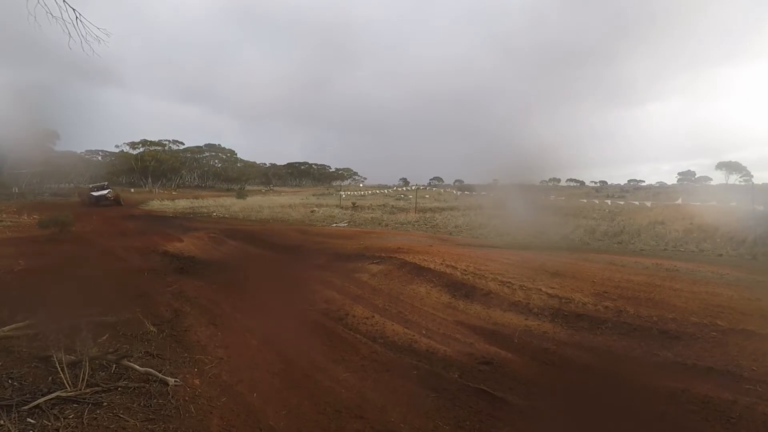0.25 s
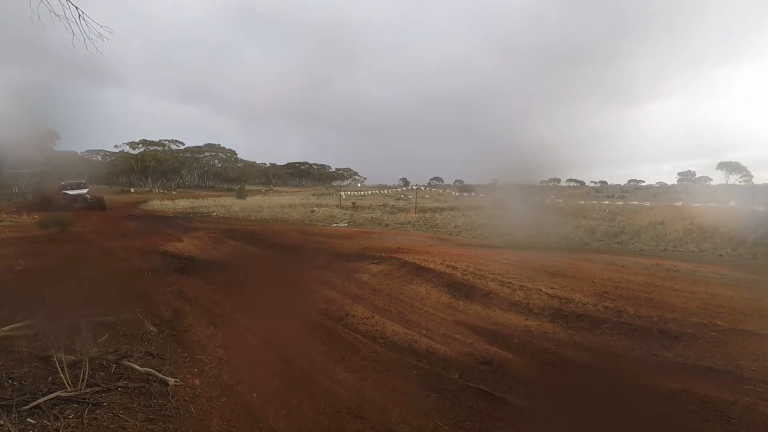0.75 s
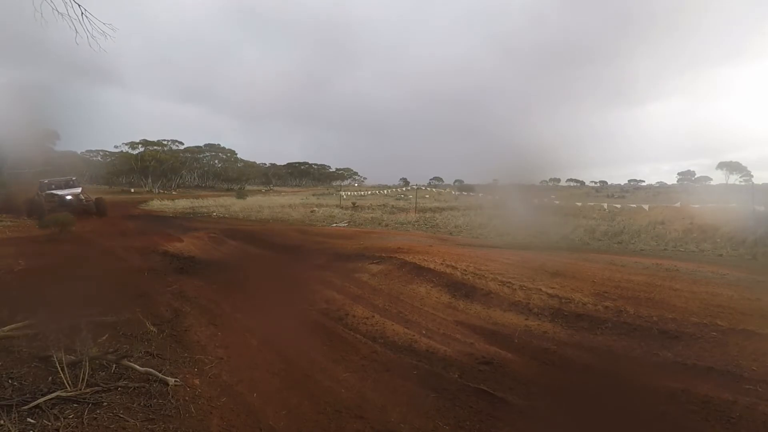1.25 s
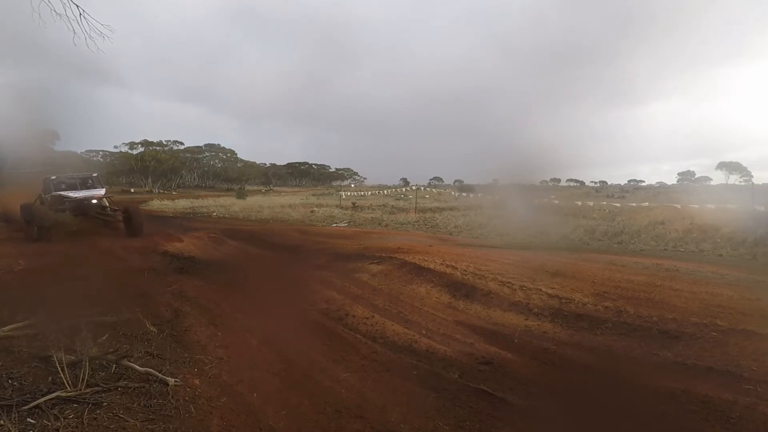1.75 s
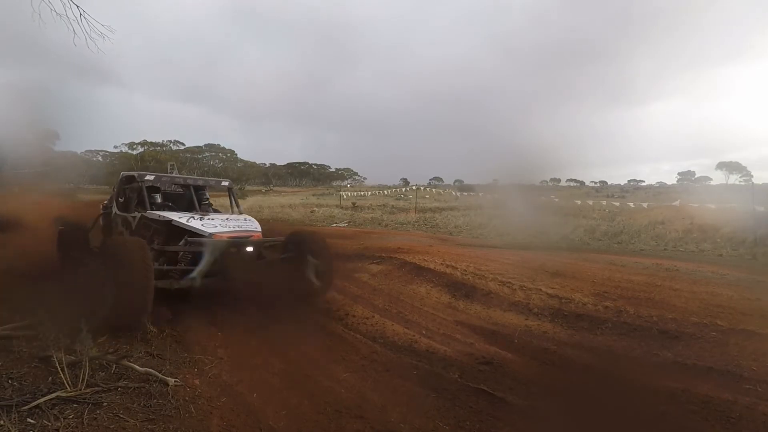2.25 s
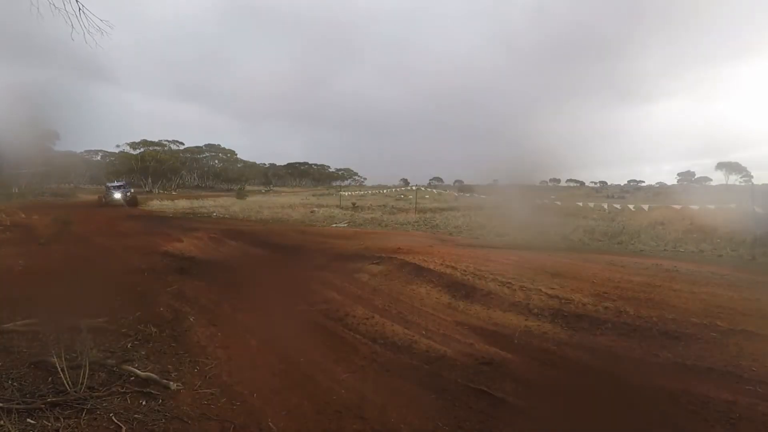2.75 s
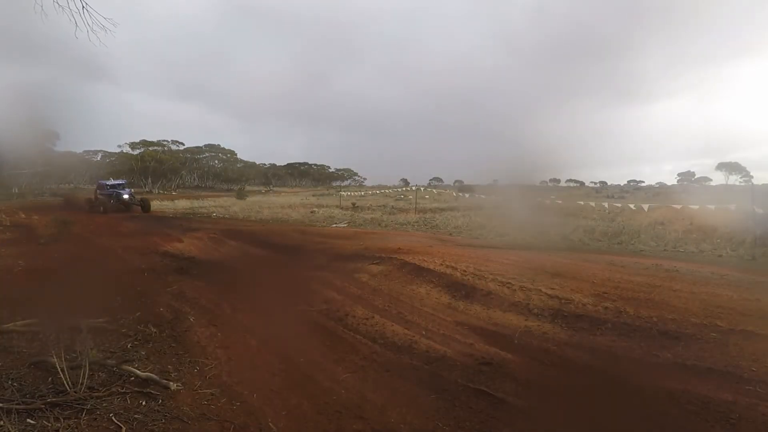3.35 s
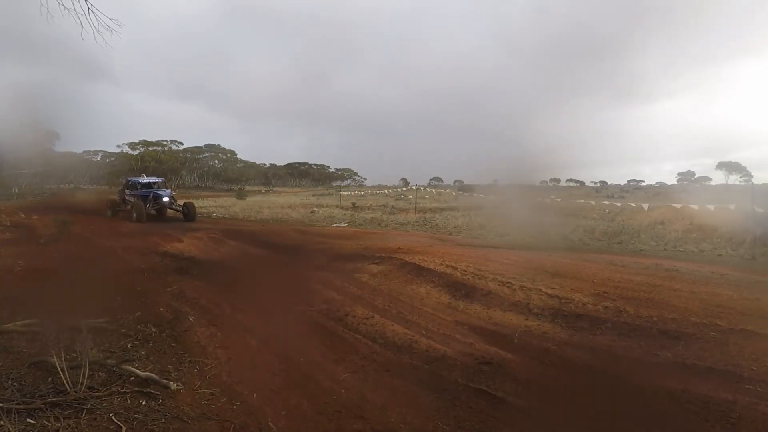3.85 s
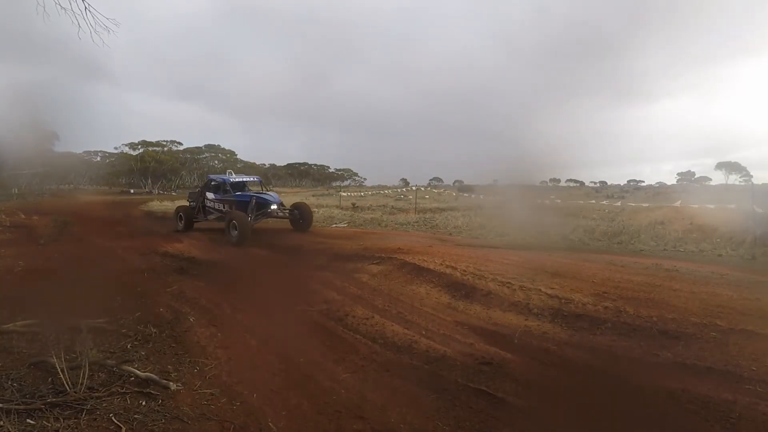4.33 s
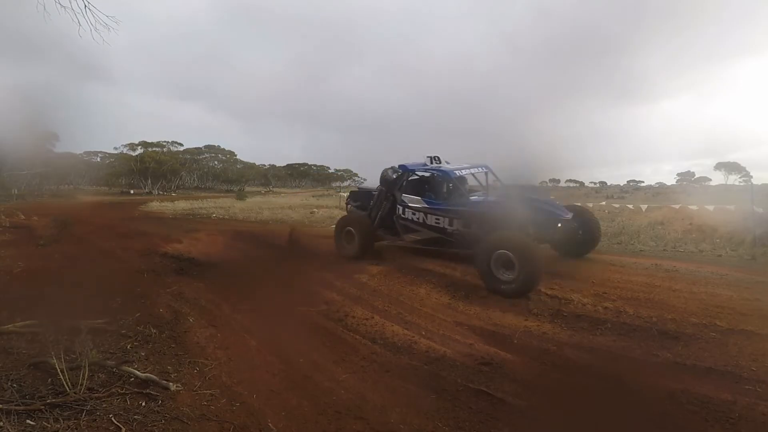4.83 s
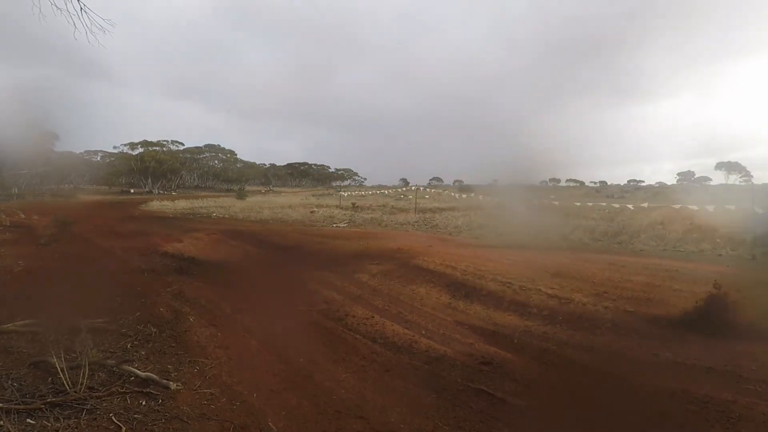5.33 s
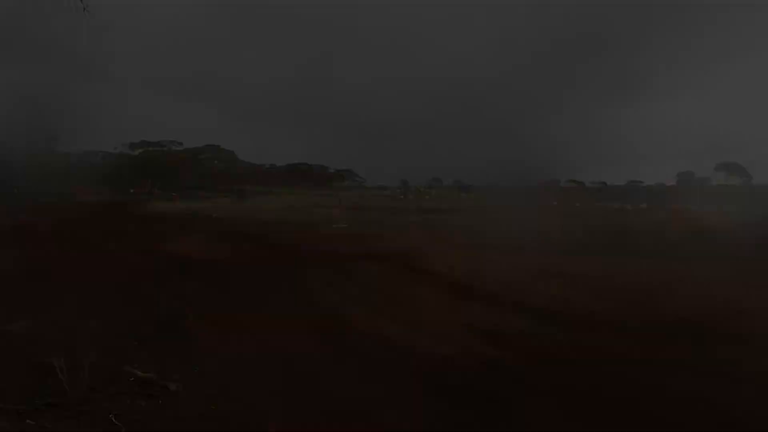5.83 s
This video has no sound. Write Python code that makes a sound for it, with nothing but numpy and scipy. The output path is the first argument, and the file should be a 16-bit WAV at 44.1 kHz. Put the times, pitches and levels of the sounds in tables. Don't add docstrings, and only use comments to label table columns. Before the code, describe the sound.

Loud off-road race buggies rev, blip and roar one after another through a gritty dirt corner, then snarl away and fade under scattered clod thuds.

```python
import sys
import numpy as np
from scipy import signal
from scipy.fft import rfft, irfft, next_fast_len
from scipy.io import wavfile
from scipy.ndimage import uniform_filter1d, minimum_filter1d

SR = 44100
rng = np.random.default_rng(int(sys.argv[2]) if len(sys.argv) > 2 else 0)


def rack_gain(trim_db):
    fader = np.asarray(trim_db, float)
    return 10 ** (fader / 20)


def master(y):
    cut = np.clip(np.atleast_2d(y).T, -1, 1)
    pcm = np.round(cut * 32767)
    wavfile.write(sys.argv[1], SR, pcm.astype(np.int16))


N = 268569
TIME = np.arange(N) / SR

FIRST_BLIP = [(0.0, 22.5, -14, 4), (0.139, 21.9, -11.5, -4.5), (0.24, 23.3, -7.5, -12),
              (0.29, 28.3, -16, 10.5), (0.37, 31.2, -8.5, 2.5), (0.479, 35.6, -4.5, -0.5),
              (0.56, 38.58, -4.5, -0.5), (0.619, 35.6, -11.5, 6.5), (0.7, 30.3, -29.5, 14)]
FIRST_PULL = [(.83, 26.4, -14.5, 5.5), (1.037, 34.3, -3.5, -5.5), (1.149, 35.1, -6.5, -1),
              (1.23, 36.44, -4, -1.5), (1.31, 37, -5, 1), (1.394, 39.26, -8.5, 1),
              (1.653, 38.52, -8.5, 0.5), (1.74, 37.52, -8, 2), (1.864, 37.52, -5, -0.5),
              (1.946, 35.06, -10, 0.5), (2.079, 32.07, -20, 10)]
THIRD_ENTRY = [(2.6, 26.8, -25, 7), (2.769, 23.8, -10, -3.5), (2.921, 29.3, -12, -3.5),
               (2.988, 26.4, -8.5, -8), (3.051, 28.4, -10, -10.5), (3.119, 24.4, -10.5, -12),
               (3.27, 31.2, -12.5, 0.5), (3.381, 32.9, -12.5, 3), (3.48, 30.3, -10.5, 1.5)]
THIRD_CORNER = [(3.48, 30.8, -17.5, 4), (3.531, 26.36, -8, -5), (3.6, 30.61, -13, -0.5),
                (3.724, 30.38, -11, 2), (3.794, 28.52, -15.5, 0.5), (3.98, 28.17, -12, 1.5),
                (4.042, 28.8, -14, -1.5), (4.098, 30, -17, 7), (4.139, 27.23, -13, -3.5)]
THIRD_SLOWING = [(4.202, 22.4, -12.5, -5.5), (4.265, 20.1, -15, -13.5), (4.322, 18.3, -17.5, -7),
                 (4.394, 16.5, -19, -7.5), (4.5, 16.7, -20, -4.5)]
THIRD_LEAVING = [(4.42, 16.92, -33, 14.5), (4.568, 22.6, -16.5, 4), (4.69, 22.5, -26.5, 15),
                 (4.739, 28.6, -6, 0), (4.812, 34.6, -1.5, -7), (4.928, 29.5, -9, -3),
                 (5.06, 27.1, -9, 0.5), (5.199, 23.3, -16, 4), (5.282, 26.6, -10, -0.5)]
THIRD_GONE = [(5.35, 30.22, -9.5, 0), (5.412, 28.29, -10.5, -2.5), (5.491, 25.34, -12.5, -1),
              (5.621, 24.85, -15, 2), (5.759, 24.72, -15, 0.5), (5.9, 23.3, -20.5, -0.5)]
# (frequency [Hz], level [dB])
HOUSING_TONE = [(1350, -8), (2300, -4), (2460, -5.5), (2940, -6), (3610, -0.5), (4120, -6), (5080, -2.5),
                (5770, -3.5), (7800, -21), (10100, -53), (17200, -120)]
# (middle [s], length [s], level [dB])
STEADY_LOAD = (1.5, 1.2, -4.5)


def evened(x):
    return x / np.sqrt(np.mean(abs(x) ** 2) + 1e-20)


def add(mix, s, sound):
    part = mix[max(round(s * SR), 0):][:len(sound)]
    part += sound[:len(part)]


def curve(rows):
    return np.interp(TIME, *np.transpose(rows))


def columns(rows):
    s, *values = np.transpose(rows)
    t = np.arange(max(s[0], 0), min(s[-1], N / SR), 1 / SR)
    return t, [np.interp(t, s, v) for v in values]


def swell(middle, length):
    return np.cos(np.pi * np.clip((TIME - middle) / length, -.5, .5)) ** 2


def coloured(x, points):
    hz, db = np.transpose(points)
    size = next_fast_len(len(x))
    f = np.fft.rfftfreq(size, 1 / SR)
    gain = rack_gain(np.interp(np.log(f + 1), np.log(hz), db, -90, -90))
    return evened(irfft(rfft(x, size) * gain, size)[:len(x)])


def drift(count, hz):
    knot_rate = 200
    knots = int(count / SR * knot_rate) + 2
    chance = rng.standard_normal((2, knots))
    smooth = signal.lfilter([1], [1, -np.exp(-2 * np.pi * hz / knot_rate)], chance)
    at = np.linspace(0, knots - 1, count)
    return evened(np.interp(at, np.arange(knots), smooth[0] + 1j * smooth[1]))


def gusty(points, lump_db, hz, gate=1):
    lumps = rack_gain(lump_db * drift(count=N, hz=hz).real)
    return coloured(rng.standard_normal(N) * lumps * gate, points)


def patchy(x, patch_db, frames, bins):
    z = signal.stft(x, nperseg=256)[2]
    field = uniform_filter1d(rng.standard_normal(z.shape), bins, 0)
    field = evened(uniform_filter1d(field, frames, 1))
    return evened(signal.istft(z * rack_gain(patch_db * field), nperseg=256)[1][:N])


def far_engine():
    # (frequency [Hz], level [dB])
    drone_tone = [(35, -41), (60, -11.5), (145, -6.5), (222, 3.5), (298, -12), (488, -9), (710, -33),
                  (908, -22.5), (1390, -37), (2350, -37), (3000, -69.5), (3900, -90), (6600, -120)]
    # (time [s], level [dB])
    rise = [(5.89, -68.5), (5.94, -48), (6.02, -43.5), (6.09, -39.5)]
    s, db = np.transpose(rise)
    gain = uniform_filter1d(rack_gain(np.interp(TIME, s, db, right=-120)), size=600)
    return gain * gusty(drone_tone, 1.5, hz=30)


def wind():
    # (frequency [Hz], level [dB])
    buffet_tone = [(15, -19.5), (25, -7), (40, -5), (60, -0.5), (100, -12), (200, -46.5)]
    # (middle [s], length [s], level [dB])
    gusts = [(0.103, 0.61, -11.5), (0.829, 0.7, -15.5), (1.495, 1.3, -21), (2.402, 1.4, -18.5),
             (3.303, 0.77, -21), (4.111, 0.32, -33), (4.493, 1.3, -12), (5.187, 0.58, -22),
             (5.56, 0.22, -29.5)]
    calm_db = -45
    buffet = rack_gain(calm_db) + sum(rack_gain(db) * swell(s, length) for s, length, db in gusts)
    return buffet * gusty(buffet_tone, 0.56, hz=6)


def tyres():
    # (frequency [Hz], level [dB])
    near_tone = [(30, -31), (60, -10), (120, 4), (250, -1), (400, -10.5), (550, -28.5), (900, -49.5)]
    away_tone = [(30, -29), (60, -9), (120, -6.5), (190, -2.5), (260, -16), (400, -23.5), (900, -34)]
    # (middle [s], length [s], drop [dB])
    smooth_dirt = [(0., 0.15, -16.5), (1.01, 0.37, -1), (2.898, 0.82, -4), (3.63, 1, -11),
                   (4.812, 0.21, -23.5), (5.42, 0.4, -6.5)]
    rumble_db = -16
    drop_db = sum(db * swell(s, length) for s, length, db in smooth_dirt + [STEADY_LOAD])
    away = np.clip((TIME - 4.7) / 0.3, 0, 1)
    near = np.sqrt(1 - away) * gusty(near_tone, 0.23, hz=8.6)
    return rack_gain(rumble_db + drop_db) * (near + np.sqrt(away) * gusty(away_tone, 1.1, hz=11.0))


def dust():
    # (middle [s], length [s], level [dB])
    settling = (5.3, 1.6, -72)
    # (frequency [Hz], level [dB])
    hiss_tone = [(11500, -21), (12200, 1), (14200, -1.5), (15200, -22)]
    middle, length, db = settling
    return rack_gain(db) * swell(middle, length) * gusty(hiss_tone, 1.7, hz=20)


def port_ring():
    # (time [s], length [s], level [dB])
    ringing = (4.08, .42, -32.5)
    # (frequency [Hz], level [dB])
    port_tone = [(2900, -30), (3300, -5), (3550, 0), (3850, -4), (4200, -30)]
    s, length, db = ringing
    count = round(length * SR)
    dip = swell(4.265, .07)[round(s * SR):][:count]
    flutter = rack_gain(3.5 * drift(count=count, hz=40).real - 6 * dip)
    hiss = coloured(rng.standard_normal(count), port_tone) * np.hanning(count) ** 0.5
    out = np.zeros(N)
    add(out, s, rack_gain(db) * flutter * hiss)
    return out


def ticks():
    # (time [s], peak [dB])
    stones = [(0.4774, -50), (2.261, -51), (2.345, -55.5), (2.406, -50), (4.07, -46.5), (4.0942, -45.5),
              (4.21, -52.5), (4.2308, -42), (4.5272, -43.5), (4.544, -54.5), (4.6182, -46), (4.66, -49.5),
              (4.711, -59), (5.234, -44)]
    # (frequency [Hz], level [dB])
    snap_tone = [(5000, -30), (8000, -2.5), (11000, -11.5), (13500, -4), (15700, -16.5)]
    out, t = np.zeros(N), np.arange(1300) / SR
    for s, db in stones:
        snap = rng.standard_normal(len(t)) * np.exp(-t / .0008)
        add(out, s, rack_gain(db - 16.5) * coloured(snap, snap_tone))
    return out


def clod_thuds():
    # (time [s], peak [dB], pitch [Hz])
    landings = [(5.237, -26.5, 1795), (5.39, -14.5, 480), (5.447, -22.5, 514.5), (5.581, -24.5, 700),
                (5.645, -18.5, 560), (5.701, -29, 600), (5.812, -23, 560)]
    # (share of its pitch [1], level [dB])
    thud_tone = [(.4, -20), (.7, -2), (1, 0), (1.4, -6), (2, -22), (2.8, -23), (4, -46), (6.3, -40),
                 (9, -50)]
    out, t = np.zeros(N), np.arange(1300) / SR
    for s, db, hz in landings:
        tone = [(share * hz, tone_db) for share, tone_db in thud_tone]
        knock = coloured(rng.standard_normal(len(t)), tone)
        add(out, s, rack_gain(db + 3.5) * knock * np.exp(-t / 0.005) * (1 - np.exp(-t / 0.0016)))
    return out


def crunch():
    # (time [s], level [dB], decay [s])
    bite = (5.233, -38.5, 0.0066)
    out, t = np.zeros(N), np.arange(1300) / SR
    s, db, decay = bite
    burst = coloured(rng.standard_normal(len(t)), HOUSING_TONE)
    add(out, s, rack_gain(db) * burst * np.e * t / decay * np.exp(-t / decay))
    return out


def squeaks():
    # (time [s], length [s], pitch [Hz], level [dB], pitch wobble [share])
    chirps = [(0.03, 0.035, 5860, -47.5, 0.027), (0.116, 0.013, 4510, -42, 0.02),
              (0.19, .02, 4080, -40, .03), (0.248, .025, 5950, -40, 0.023),
              (0.288, 0.035, 5560, -43, 0.032), (0.8, 0.019, 6000, -41, 0.021),
              (2.108, 0.024, 5880, -44, 0.015), (2.199, 0.038, 4020, -38.5, 0.0072),
              (2.237, 0.02, 4650, -36.5, 0.017), (2.247, 0.03, 4907, -29.5, .012),
              (2.272, 0.016, 4900, -40.5, .02), (2.329, 0.023, 4860, -40, 0.018),
              (2.353, 0.036, 4970, -42, 0.0096), (2.102, 0.019, 3750, -41, .02),
              (2.158, 0.014, 4600, -37, .02), (3.708, 0.06, 3650, -37, 0.06),
              (3.886, 0.06, 3580, -39, 0.055), (4.708, 0.046, 4530, -31.5, 0.034),
              (5.305, 0.088, 6720, -51, 0.018)]
    out = np.zeros(N)
    for s, length, hz, db, wobble in chirps:
        u = np.arange(0, length, 1 / SR)
        chance = drift(count=len(u), hz=80)
        phase = 2 * np.pi * np.cumsum(hz * (1 + wobble * chance.real)) / SR
        add(out, s, rack_gain(db + 3.2 * chance.imag) * np.sin(phase) * np.hanning(len(u)) ** 0.31)
    return out


def thrown_db(column):
    # (time [s], coarse boost [dB], fine boost [dB], decay [s])
    showers = [(.118, -1.5, -4, 0.02), (.19, 3.5, -1.5, 0.035), (.459, 9, 4.5, 0.14), (.57, 2.5, 4, 0.033),
               (.803, 4.5, -1.5, 0.027), (1.16, -1.5, 6.5, 0.14), (1.79, 3, 14.5, 0.082),
               (1.97, 0.5, 4, 0.055), (2.074, 4, -4, 0.056), (2.185, 7, 1, 0.025), (2.257, -2, -1, 0.016),
               (2.337, 1.5, 11, 0.0308), (2.4, 7.5, 8, 0.043), (2.512, -1.5, 2.5, 0.046),
               (2.68, 2.5, 8, 0.055), (3.15, 6, 7, 0.046), (3.36, 3.5, 2.5, .05), (3.556, 4.5, 2, 0.035),
               (3.66, 1.5, -9, 0.091), (3.822, 3.5, -1, 0.026), (3.959, -4.5, -2, 0.019),
               (4.035, 6.5, -1, .08), (4.17, 2.5, -0.5, 0.15), (4.2, 7.5, 4.5, 0.17),
               (4.5, 4.5, 0.5, 0.037), (4.544, 4.5, 3.5, 0.07), (4.607, 2, 5.5, .04),
               (4.71, 1.5, 11, 0.045), (5.233, 7.5, 9.5, 0.12)]
    out = np.zeros(N)
    for row in showers:
        add(out, row[0], row[column] * np.exp(-TIME[:SR // 2] / row[3]))
    return uniform_filter1d(out, size=400)


def gritty(per_s, spread_db, share):
    size = rack_gain(spread_db * np.minimum(rng.exponential(1, N), 5)) * rng.choice([-1., 1.], N)
    grains = evened(size * (rng.random(N) < per_s / SR))
    return share * grains + (1 - share) * rng.standard_normal(N)


def gravel():
    # (time [s], level [dB])
    spin = [(0, -3), (.45, -2), (0.95, -2.5), (1.27, 5.5), (1.99, -2), (2.06, -8.5), (2.26, -0.5),
            (2.49, -3), (2.52, 2.5), (3.63, 1.5), (3.68, -3), (4.17, 3.5), (4.48, 4), (4.73, 6), (4.8, 1.5),
            (5.21, -10), (5.5, -11)]
    # (frequency [Hz], level [dB])
    early_tone = [(1350, -41.5), (2300, -7.5), (2750, -15.5), (3200, -2), (3500, -1.5), (4400, -2),
                  (5150, -10), (5920, -5.5), (7260, -28.5), (7800, -33.5), (10100, -64), (17200, -120)]
    fizz_tone = [(4000, -24.5), (6800, -7.5), (7400, -12.5), (8400, -4.5), (9600, -12), (10800, -21.5),
                 (11800, -23.5), (12800, -15), (13800, -22), (14700, -33), (15600, -47.5)]
    spin_db = curve(spin)
    finer_db = 0.5 * (TIME - 5)
    spray = rack_gain(-40 + spin_db + thrown_db(column=1))
    fizz = rack_gain(-58.5 + 0.67 * spin_db + thrown_db(column=2) + finer_db)
    hail = gritty(1500, 3.1, 0.11) * rack_gain(0.72 * drift(count=N, hz=25).real)
    later = np.clip((TIME - 1.3) / 1.1, 0, 1)
    coarse = np.sqrt(1 - later) * coloured(hail, early_tone)
    coarse += np.sqrt(later) * coloured(hail[::-1], HOUSING_TONE)
    fine = patchy(coloured(hail, fizz_tone), 2.0, frames=8, bins=8)
    return spray * patchy(coarse, 1.88, frames=10, bins=3) + fizz * fine


def resonances(rows):
    out = np.zeros(N)
    for s, length, hz, db in rows:
        u = np.arange(0, length, 1 / SR)
        note = (drift(count=len(u), hz=60) * np.exp(2j * np.pi * hz * u)).real
        add(out, s, rack_gain(db) * note * np.hanning(len(u)) ** .5)
    return out


def panel_hums():
    # (time [s], length [s], pitch [Hz], level [dB])
    panels = [(2.566, .3, 1044, -39.5), (2.64, .2, 1872, -37.5), (2.78, 0.093, 1540, -32),
              (3.003, 0.087, 1440, -38), (3.318, 0.11, 1498, -31.5), (3.569, 0.22, 1467, -35.5),
              (4.011, 0.066, 1500, -29.5), (4.522, .12, 1370, -31.5), (4.711, 0.063, 1780, -33.5),
              (4.908, .04, 1270, -29.5), (5.282, 0.15, 1637, -34.5), (5.485, .035, 1406, -34)]
    return resonances(panels)


def pipe_booms():
    # (time [s], length [s], pitch [Hz], level [dB])
    booms = [(0.298, .09, 443.6, -23), (0.788, .17, 435, -26), (4.944, 0.063, 577, -26),
             (4.99, 0.11, 382.3, -20.5), (5.008, .08, 290.6, -24), (5.117, 0.1, 396, -21.5),
             (5.306, 0.1, 571, -27.5), (5.317, .1, 410, -24.5), (5.427, .05, 543, -19),
             (4.8, 0.089, 423, -30)]
    return resonances(booms)


def firing(depth):
    near = FIRST_BLIP + FIRST_PULL + THIRD_ENTRY + THIRD_CORNER[1:] + THIRD_SLOWING
    rates = [(s, 8 * hz) for s, hz, *_ in near]
    rates += [(s, 3 * hz) for s, hz, *_ in THIRD_LEAVING[3:] + THIRD_GONE]
    turns = np.cumsum(curve(rates)) / SR
    away = np.clip((TIME - 4.7) / .1, 0, 1)
    depth = depth * (1 + 1.2 * away)
    decay = 1.2 - .7 * away
    strength = rack_gain(3.3 * rng.standard_normal(2000))[turns.astype(int)]
    return evened(1 - depth + depth * 3 * strength * np.exp(-(turns % 1) / decay))


def notched(x):
    # (middle [s], length [s], frequency [Hz], depth [dB])
    echo_dips = [(4.3, 0.33, 850, -7), (2.85, 0.95, 1100, -4), (0.77, 0.27, 600, -9), (5.6, 0.49, 760, -8)]
    hz, t, z = signal.stft(x, SR, nperseg=1024)
    dip_db = 0
    for s, length, f, db in echo_dips:
        band = np.exp(-(np.log((hz + 1) / f) / 0.27) ** 2)
        dip_db = dip_db + db * np.outer(band, np.exp(-(2 * (t - s) / length) ** 2))
    return signal.istft(z * rack_gain(dip_db), nperseg=1024)[1][:N]


def exhaust_noise():
    # (time [s], level [dB])
    throttle = [(0, -4.5), (0.11, -9), (0.45, -0.5), (0.81, -4), (1.2, 0.5), (1.71, 1.5), (1.83, -2),
                (1.96, -0.5), (2.06, -9), (2.21, -1), (2.29, -4.5), (2.82, 3), (2.87, 0.5), (4.25, 4.5),
                (4.91, 2.5), (5.19, -5), (5.36, 5.5), (5.52, -8)]
    # (time [s], level [dB])
    turned = [(2.3, -1.5), (2.8, -6.5), (3.1, -9), (4.9, -9), (5.1, 0), (5.45, -3.5), (5.62, -4.5),
              (5.8, -5.5)]
    # (frequency [Hz], level [dB])
    bark_tone = [(300, -21), (400, 10), (480, 3), (600, -2.5), (800, -6.5), (1100, -12)]
    rasp_tone = [(410, -25.5), (700, 1), (954, -5), (1030, 0.5), (1120, -0.5), (1480, -3), (1920, -6.5),
                 (2290, -19), (2900, -34), (3770, -40), (6380, -120)]
    middle, length, clean_db = STEADY_LOAD
    throttle_db = curve(throttle)
    bark = rack_gain(-23.5 + 0.84 * throttle_db + curve(turned) + clean_db * swell(middle, length) ** .5)
    rasp = rack_gain(-33.5 + throttle_db)
    puffs = bark * gusty(bark_tone, 0.48, 6.7, firing(0.18))
    hiss = patchy(gusty(rasp_tone, 0.45, 31, firing(0.063)), 1.4, frames=14, bins=2)
    return notched(puffs + rasp * hiss)


def burbles():
    # (start [s], length [s], firing rate [Hz], level [dB])
    shut_throttle = [(-.1, 0.41, 139.6, -10.5), (0.671, .12, 157.6, -6.5), (4.406, 0.35, 175, -14.5)]
    out = np.zeros(N)
    for s, length, hz, db in shut_throttle:
        waver = 1 + 0.048 * drift(count=N, hz=8.1)
        tone = (waver * np.exp(2j * np.pi * hz * TIME)).real
        out += 1.23 * rack_gain(db) * swell(s + length / 2, length) * tone
    return out


def engine(rows, main, orders, upper, rough, facing_db=np.zeros(N), upper_rough=0):
    # (frequency [Hz], level [dB])
    pipe_tone = [(30, 2), (60, 2), (100, -1.5), (150, 2.5), (220, 0), (300, 3), (450, -2), (800, 1)]
    bright_db = 22
    t, (hz, level_db, uneven_db) = columns(rows)
    angle = 2 * np.pi * np.cumsum(hz) / SR
    pipe_hz, pipe_db = np.transpose(pipe_tone)
    facing = facing_db[round(t[0] * SR):][:len(t)]
    tones = np.zeros(len(t))
    for k, db in orders:
        pipe = np.interp(np.log(k * hz), np.log(pipe_hz), pipe_db)
        speed_db = bright_db * (k != 2 * main) * np.log2(hz / hz.max())
        bright = (speed_db + facing) * (k >= upper)
        gain = rack_gain(level_db + db + pipe + bright + uneven_db * (k != main))
        side_rough = max(1.15 * rough, upper_rough * (k >= upper), .8 * (k >= 20))
        share = np.clip(rough if k == main else side_rough, 0, 1)
        waver = np.sqrt(1 - share ** 2) + share * drift(count=len(t), hz=11)
        tones += 1.238 * gain * (waver * np.exp(1j * (k * angle + 2 * np.pi * rng.random()))).real
    out = np.zeros(N)
    add(out, t[0], tones * signal.windows.tukey(len(t), 0.0029 * SR / len(t)))
    return out


def second_buggy():
    # (time [s], crank turn rate [Hz], level [dB], uneven burn
    # [dB])
    pass_by = [(2.15, 68, -26.5, -3), (2.22, 74.7, -20, -12), (2.45, 77, -16.5, -9.5),
               (2.65, 78.4, -22, 8), (2.71, 81.4, -17.5, 0), (2.9, 77, -11, -6.5), (3.042, 72, -6.5, -7.5),
               (3.154, 77, -11, -2), (3.274, 74.4, -13, 2),
               (3.4, 80.16, -12.5, 2), (3.51, 76.4, -13.5, 0.5),
               (3.549, 78.25, -16.5, 4.5), (3.732, 81.91, -13.5, 1.5), (3.819, 79.35, -22.5, 2),
                (3.93, 77.27, -17, -2), (4.05, 77.86, -13.5, -5.5), (4.18, 79.6, -13.5, -2),
                (4.339, 80.9, -21, 3.5), (4.431, 78, -15, 2), (4.589, 79, -21.5, 8.5),
               (4.711, 77.2, -14, -3), (4.79, 76.3, -16, -3), (4.85, 73, -34, 0.5)]
    # (order [1], level [dB])
    orders = [(1, -22), (2, -11.5), (3, -23.5), (4, -2), (5, -5), (6, -15), (7, -31.5), (8, -32), (9, -31),
              (10, -48)]
    # (middle [s], length [s], lift [dB])
    pipes_facing = (2.85, 2.2, 16.6)
    middle, length, db = pipes_facing
    run = pass_by
    return engine(run, 4, orders, 7, .13, db * swell(middle, length), .35)


def first_buggy():
    # (order [1], level [dB])
    orders = [(1, -21), (2, -12), (3, -24), (4, -11), (5, -15.5), (6, -11), (7, -12.5), (8, 0.5), (9, -19),
              (10, -14), (11, -20.5), (12, -15.5), (13, -26.5), (14, -21.5), (15, -25.5), (16, -24),
              (17, -38.5), (18, -26.5), (19, -37.5), (22, -36), (23, -38), (25, -41.5), (26, -36),
              (27, -42.5), (29, -41), (30, -36.5), (31, -43.5), (33, -39.5)]
    # (time [s], level [dB])
    pipes_turning = [(.3, 5), (.5, -6.5), (.75, -7), (.9, 2), (1.15, -1), (1.4, 1), (1.85, 4), (2.05, 5.5)]
    # (time [s], firing rate [Hz], level [dB])
    coasting = [(2.01, 173, -16), (2.036, 178.1, -10), (2.135, 155.3, -9), (2.456, 153.1, -12),
                (2.645, 139.6, -15.5), (2.681, 168, -11.5)]
    pulling = engine(FIRST_BLIP + FIRST_PULL, 8, orders, 13, .12, curve(pipes_turning), .3)
    coast_orders = [(.25, -16), (.625, -16), (1, 0), (1.375, -12)]  # (share of firing rate, dB)
    return pulling + engine([(*row, 0) for row in coasting], 1, coast_orders, 9, .15)


def third_buggy():
    # (order [1], level [dB])
    entry_orders = [(1, -19), (2, -11.5), (3, -5), (4, -19), (5, -7), (6, -8), (7, -9.5), (8, 1.5),
                    (9, -14), (10, -13.5), (11, -11.5), (13, -16.5), (16, -29.5)]
    corner_orders = [(1, -18), (2, -17), (3, -1), (4, -17), (5, -0.5), (6, -13.5), (7, -10), (8, 2.5),
                     (9, -7.5), (10, -7), (11, -3.5), (13, -11.5), (14, -24.5), (16, -16.5), (19, -34.5)]
    leaving_orders = [(1, -27.5), (2, -9), (3, -0.5), (4, -24.5), (5, 0), (6, -12), (7, -21), (8, -19.5),
                      (9, -19), (10, -25.5), (11, -21), (12, -23.5), (13, -16.5), (14, -20), (15, -22),
                      (16, -29), (17, -26.5), (18, -23.5), (19, -20.5), (20, -23), (21, -28), (23, -32),
                      (25, -32.5), (27, -29)]
    # (time [s], level [dB])
    snarl = [(4.7, -3), (4.8, 2), (4.9, 3), (4.96, 8), (5.07, 10.5), (5.11, -4.5), (5.19, 8), (5.25, -4),
             (5.33, 2.5), (5.4, 6.5), (5.45, 2.5), (5.5, -9), (5.55, 4), (5.62, -16), (5.9, -13)]
    entry = engine(THIRD_ENTRY, 8, entry_orders, 99, .13)
    corner = engine(THIRD_CORNER + THIRD_SLOWING, 8, corner_orders, 99, .1)
    leaving = engine(THIRD_LEAVING + THIRD_GONE, 5, leaving_orders, 8, .2, curve(snarl) + 2, upper_rough=.3)
    return entry + corner + leaving


def fade():
    # (from [s], to [s], curve power [1])
    fade_out = (5.488, 5.916, 1.11)
    start, end, power = fade_out
    return np.clip((end - TIME) / (end - start), 0, 1) ** power


def scene():
    mix = wind() + tyres() + dust() + port_ring() + gravel()
    mix += panel_hums() + pipe_booms() + exhaust_noise() + burbles()
    mix += second_buggy() + first_buggy() + third_buggy()
    small_events = ticks() + clod_thuds() + crunch() + squeaks()
    return (mix * fade() + small_events + far_engine())[None]


def top_cut(x):
    return signal.sosfilt(signal.butter(12, 15710, fs=SR, output="sos"), x)


def record(dry):
    ceiling = .945
    room = np.minimum(1, 1.07 * ceiling / (abs(dry) + 1e-9))
    gain = uniform_filter1d(minimum_filter1d(room, size=201), size=101)
    gain = uniform_filter1d(gain, size=101)
    mix = np.clip(dry * gain, -ceiling, ceiling)
    return top_cut(mix)


dry = scene()
out = record(dry)
master(out)
```